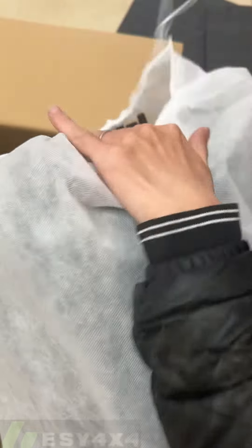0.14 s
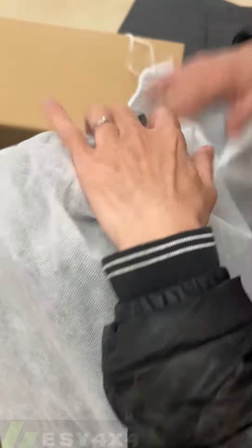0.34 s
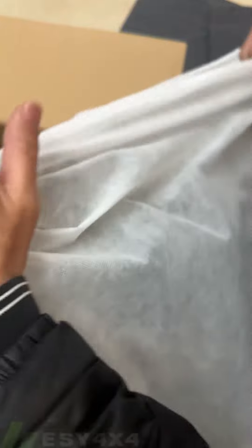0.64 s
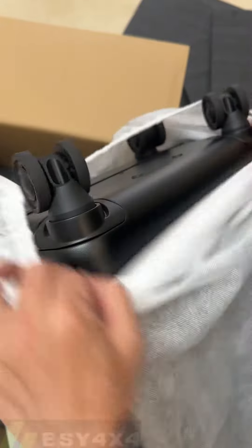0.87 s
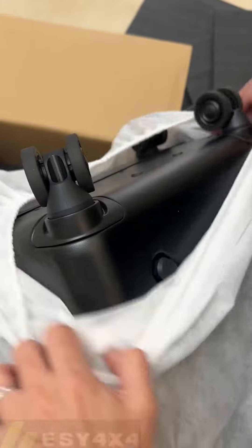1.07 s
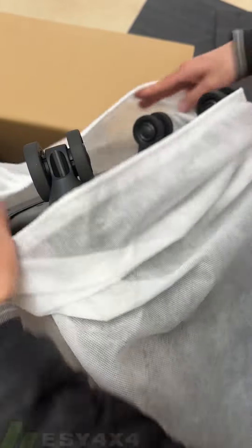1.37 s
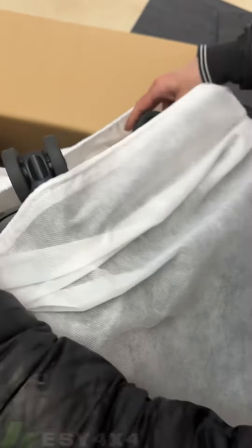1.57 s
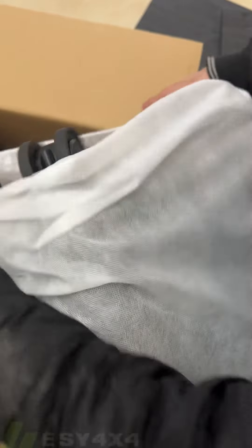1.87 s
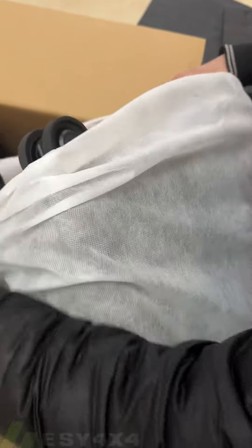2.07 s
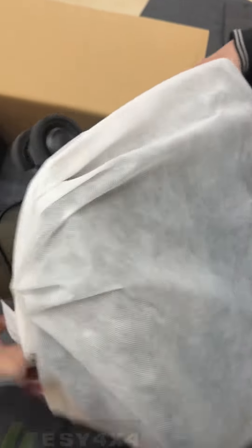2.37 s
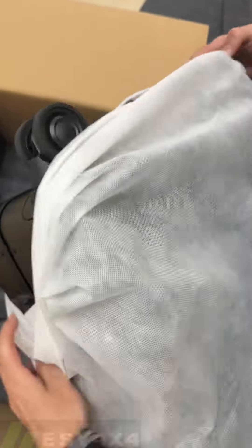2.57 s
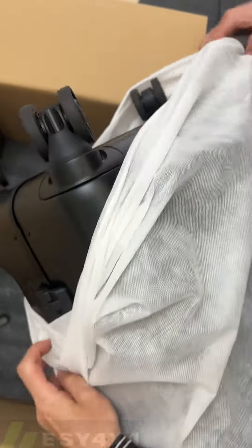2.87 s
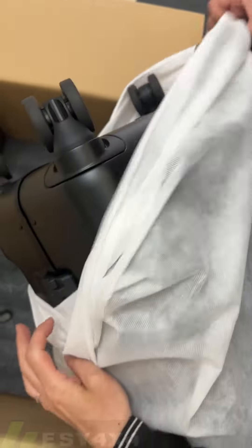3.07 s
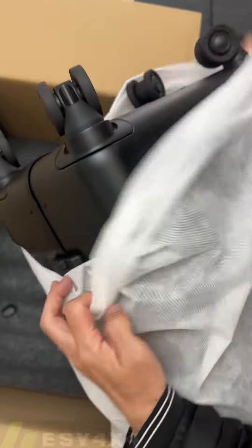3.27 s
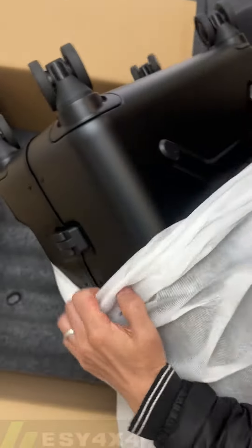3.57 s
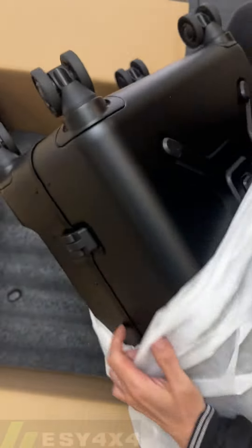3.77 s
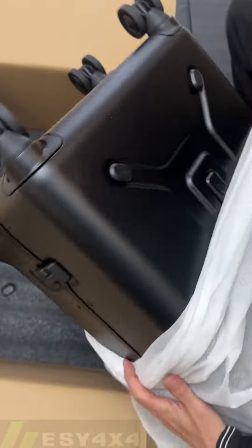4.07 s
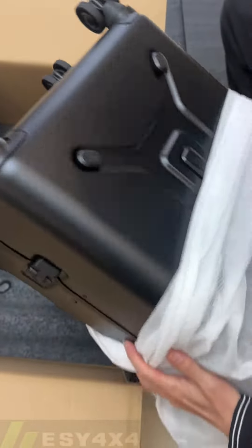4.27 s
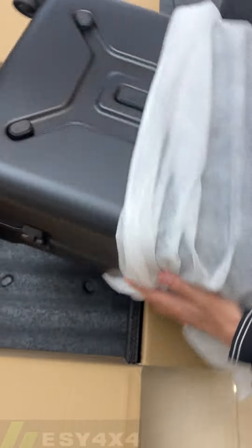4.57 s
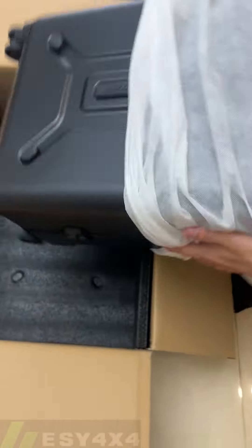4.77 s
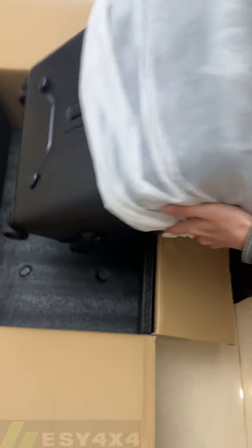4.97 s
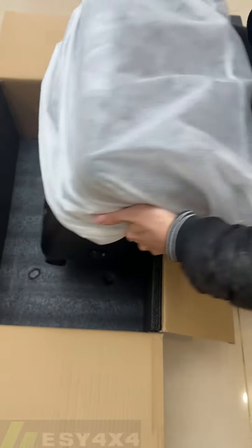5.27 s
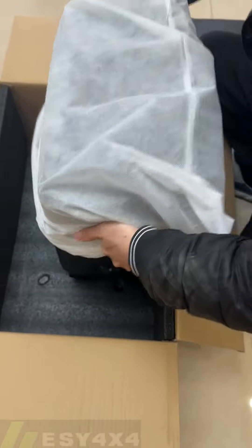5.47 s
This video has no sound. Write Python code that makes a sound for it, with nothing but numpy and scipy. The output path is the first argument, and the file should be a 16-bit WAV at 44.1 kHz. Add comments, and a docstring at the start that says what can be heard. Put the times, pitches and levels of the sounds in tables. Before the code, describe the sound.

Thin fabric bag is dragged off a hollow hard suitcase in a cardboard box, with rustling, scuffing, snaps and dull thumps.

```python
"""In a small room, a soft fabric bag is dragged off a hollow hard suitcase that lies in a cardboard box.
Cloth is shaped noise in swells, snaps are short noise bursts, bumps are rung shell modes with a hard knock.
The sliding shell rumbles as uneven noise; a low hum wavers below, with deep lurches and room tone behind.
A small stereo microphone hears it from close by, as a sum and a difference of two ports."""
import sys
import numpy as np
from scipy import signal
from scipy.fft import rfft, irfft, next_fast_len
from scipy.io import wavfile
from scipy.ndimage import uniform_filter1d, map_coordinates

SR = 44100
rng = np.random.default_rng(int(sys.argv[2]) if len(sys.argv) > 2 else 0)


def materialize(psi):
    """Save the field psi as 16-bit PCM at rate SR to the path in sys.argv[1].

    A 1-D psi becomes a single channel; in a 2-D psi each row is a channel.
    """
    bounded = np.clip(np.atleast_2d(psi).T, -1, 1)
    quanta = np.round(bounded * 32767).astype(np.int16)
    wavfile.write(sys.argv[1], SR, quanta)


N = 248283  # length in samples


def amp(db):
    """dB to gain."""
    return 10 ** (np.asarray(db) / 20)


def unit(x):
    """Each row at rms 1."""
    return x / np.sqrt(np.mean(x ** 2, axis=-1, keepdims=True) + 1e-20)


def along(points, hz):
    """Each column after the frequency, read on a log axis."""
    point_hz, *columns = np.transpose(points)
    log_hz, log_point_hz = np.log(hz + 1), np.log(point_hz + 1)
    return np.squeeze([np.interp(log_hz, log_point_hz, column) for column in columns])


def curves(rows):
    """One value per sample for each column after the time."""
    time_s, *columns = np.transpose(rows)
    return [np.interp(np.arange(N) / SR, time_s, column) for column in columns]


def wobble(knots_per_s):
    """Smooth random curve through normally distributed knots."""
    knots = rng.standard_normal(int(N * knots_per_s / SR) + 4)
    return map_coordinates(knots, [np.arange(N) * knots_per_s / SR])


def filtered(x, response):
    """x times a complex response of frequency."""
    size = next_fast_len(N + SR // 2)
    spectrum = rfft(x, size) * response(np.fft.rfftfreq(size, 1 / SR))
    return irfft(spectrum, size)[..., :N]


def smoothed(x, size, axis=-1):
    """Two passes of a running mean."""
    return uniform_filter1d(uniform_filter1d(x, size, axis), size, axis)


def rush(spectrum, patchy_db, grain_db):
    """Two unrelated noises of rms 1, straight and scattered path, sharing patches and fibre ticks."""
    ticks_db = grain_db * np.repeat(rng.exponential(size=N // 32 + 1), 32)[:N]
    noise = amp(ticks_db) * rng.standard_normal((2, N))
    cells = signal.stft(noise, nperseg=512)[2]
    # patches in time and frequency
    field = rng.standard_normal(cells.shape[1:])
    field = uniform_filter1d(uniform_filter1d(field, 8, 0), 8, 1)
    patches = amp(patchy_db * field / field.std())
    pair = signal.istft(cells * patches, nperseg=512)[1][:, :N]
    return unit(filtered(pair, lambda hz: amp(along(spectrum, hz))))


def swells(peak_s, peak_db, rise_db_per_s, fall_db_per_s):
    """Gain of swells that climb to a rounded peak and sink at a steady dB rate; their powers add."""
    round_s = 0.0061
    peak_s, peak_db, rise, fall = [
        np.reshape(v, (-1, 1)) for v in (peak_s, peak_db, rise_db_per_s, fall_db_per_s)]
    steps = np.arange(0, N + 64, 64)
    t = steps / SR - peak_s
    slope = np.abs(np.where(t < 0, rise, fall))
    gain = amp(peak_db - slope * (np.hypot(t, round_s) - round_s))
    return np.interp(np.arange(N), steps, np.linalg.norm(gain, axis=0))


# pulls on the cloth: (peak time [s], hiss [dB], scuff of the heavier folds [dB], rise [dB/s], fall [dB/s])
CLOTH_PULLS = [(0.25, -57, -80, 800, 290), (0.322, -43.5, -43, 502, 222), (0.499, -50, -51, 73, 125),
               (0.711, -49, -51, 600, 44), (0.826, -50, -42, 502, 400), (0.935, -55.5, -55, 70, 110),
               (1.055, -53.5, -56, 200, 250), (1.15, -51, -51, 220, 31), (1.45, -54, -55, 330, 125),
               (1.485, -55, -55, 200, 600), (1.69, -53.5, -51.5, 90, 29), (1.887, -45, -44.5, 64, 43),
               (2.252, -53, -51, 34, 57), (2.48, -52.5, -50.5, 112, 32), (2.62, -64, -63, 60, 60),
               (2.738, -43, -41.5, 177, 255), (3.025, -52, -53, 300, 92), (3.14, -49.5, -52.5, 220, 53),
               (3.305, -55.5, -51, 76, 15), (3.64, -45.5, -46.5, 24.5, 49), (3.82, -52.5, -49, 200, 45),
               (3.93, -48, -50.5, 35, 116), (4.091, -59, -47.5, 89, 44), (4.43, -40.5, -44.5, 37.5, 87),
               (4.627, -48, -48.5, 68, 75), (4.9, -49, -48, 42, 95), (5.345, -60.5, -50.5, 27, 35),
               (5.469, -48, -48.5, 106, 123), (5.525, -60, -50, 100, 260)]
# fibre hiss spectrum: (frequency [Hz], relative level [dB per Hz])
HISS_SPECTRUM = [(1500, -17), (3500, -7.5), (5500, -3), (8000, -0.5), (11000, -3), (16000, -11)]
# fold scuff spectrum: (frequency [Hz], relative level [dB per Hz])
SCUFF_SPECTRUM = [(200, -62), (600, -2.5), (1200, -2), (2500, -3.5), (4200, -6.5), (6000, -12),
                  (12000, -21)]


def cloth():
    """Fibres hiss over the shell, folds scuff lower down; pulls stutter together over a steady faint rustle."""
    rustle_db, folds_db = -59.5, -60  # steady levels between pulls
    peak_s, hiss_db, scuff_db, rise, fall = np.transpose(CLOTH_PULLS)
    stutter = wobble(45)
    hiss_pulls = swells(peak_s, hiss_db, rise, fall) * amp(0.82 * stutter)
    scuff_pulls = swells(peak_s, scuff_db, rise, fall) * amp(1.4 * stutter)
    hiss = np.hypot(hiss_pulls, amp(rustle_db)) * rush(HISS_SPECTRUM, patchy_db=1.2, grain_db=1.0)
    scuff = np.hypot(scuff_pulls, amp(folds_db)) * rush(SCUFF_SPECTRUM, patchy_db=1.26, grain_db=1.0)
    return hiss + scuff


# snaps of cloth and cord:
# (time [s], peak [dB], centre [Hz], spread each way [pitch ratio, at least 1.1 is used], t60 [s])
CLOTH_SNAPS = [(0.04, -47, 2800, 0.96, 0.034), (0.239, -31.5, 8700, 1.56, 0.038),
               (0.2816, -34, 2400, 1.35, .016), (0.3097, -17, 2500, 2, 0.025),
               (0.3181, -14, 2320, 1.94, 0.021), (0.6276, -43, 6990, 1.6, .015),
               (0.7315, -39, 2970, 0.87, .04), (0.771, -33, 3010, 2.1, .02),
               (0.8173, -30, 3440, 1.9, 0.034), (0.8237, -26, 3480, 1.87, 0.023),
               (0.863, -34, 2860, 1.8, 0.02), (0.9116, -38, 2570, 1.15, .02),
               (2.0309, -33.5, 7080, 1.2, .025), (2.2287, -36, 6960, 1.25, .025),
               (2.7294, -18, 4440, 1.54, 0.014), (2.7392, -28, 4030, 1.3, .028),
               (2.86, -45, 2590, 1.07, .02), (2.9846, -38.5, 2000, 1.5, .016),
               (3.012, -41, 4300, 1.05, 0.036), (3.793, -26, 2370, 1.45, 0.015),
               (4.588, -46, 6500, 1.6, .02), (4.613, -38, 2260, 1.06, .03),
               (4.6201, -23, 10200, 1.28, 0.0093), (5.452, -36, 2670, 0.82, .015),
               (5.474, -30, 2780, 1.05, .014)]


def snaps():
    """A fold or the cord lets go: a burst of noise around its own pitch."""
    out, t = np.zeros(N + SR), np.arange(SR // 8) / SR
    rise = 1 - np.exp(-t / .0005)
    for time_s, peak_db, centre_hz, spread, t60_s in CLOTH_SNAPS:
        ratio = max(spread, 1.1)
        band_hz = [centre_hz / ratio, min(centre_hz * ratio, 19000)]
        bandpass = signal.butter(2, band_hz, "bandpass", fs=SR, output="sos")
        noise = signal.sosfilt(bandpass, rng.standard_normal(len(t)))
        burst = amp(-60 * t / t60_s) * rise * noise
        out[round(time_s * SR):][:len(t)] += amp(peak_db) * burst / np.abs(burst).max()
    return out[:N]


# bumps on the shell: (time [s], ring peak [dB], pitch that the spot favours [Hz],
# hard edge before a common lift [dB re ring peak], ring time [share of free ring], softness [cycles of swell])
SHELL_BUMPS = [(0.282, -34, 560, 0, .92, 0.61), (0.31, 0, 253.5, -14.5, .8, 0.82),
               (0.911, -28.5, 360, -4.5, 0.56, 1.7), (0.934, -30, 207, -19, 0.55, 0.4),
               (1.051, -34.5, 144, -18, 0.52, 1.9), (1.385, -29, 186, -47, 1.16, 1.3),
               (1.875, -32, 710, -4, 0.23, 0.75), (1.884, -27, 236, -16, 0.8, 0.41),
               (2.248, -28.5, 197, -21, 1.1, 1.8), (2.415, -37, 570, -6, 0.68, 1.2),
               (2.485, -26, 197, -32, 0.87, 1.7), (2.746, -36.5, 218, -24, 0.9, 0.86),
               (2.859, -28.5, 326, -8.5, 0.47, 3.3), (3.011, -33.5, 360, -7, 0.45, 3.6),
               (3.021, -23.5, 133, -17, 0.6, 1.1), (3.118, -33, 148, -6, 1.5, 1.4),
               (3.177, -24, 148, -40, 0.26, 1.8), (3.301, -26.5, 260, -38, 0.27, 5.7),
               (3.547, -34, 486, -28, 0.81, 1.04), (3.797, -24.5, 146, -11, .44, 1),
               (3.875, -26, 236, -24, 0.5, 0.76), (3.915, -39, 135, -5, 1.3, 1.4),
               (3.946, -33.5, 132, -10, 0.28, 0.69), (4.02, -40, 210, -15, 1, 2.6),
               (4.049, -28, 416, -38, 0.68, 1.2), (4.084, -24, 204, -45, 0.57, 0.36),
               (4.462, -26, 570, -31, 0.76, 0.55), (4.879, -33, 436, -24, 1.5, .75),
               (4.894, -33, 181, -21, 0.79, 0.92), (5.053, -42, 132, -11, 1.1, 1.1),
               (5.242, -36.5, 132, -12, 1.1, 0.92), (5.451, -19, 290, -11.5, 1, 0.93),
               (5.47, -19.5, 350, -22, 1.66, 1), (5.485, -17, 132, -22, .74, 0.31),
               (5.512, -19, 153, -18, 0.5, 0.79), (5.519, -16.5, 141, -19, 0.82, .91)]
# modes of the free shell: (frequency [Hz], relative level, halved in use [dB], base t60 [s])
SHELL_MODES = [(48, -7, 0.47), (101.8, -21, 0.26), (142.9, -3.5, 0.52), (157.5, 13.5, 0.17),
               (214.8, -12.5, 0.31), (225.2, 5.5, 0.25), (309, -3.5, 0.15), (337.4, -5.5, 0.16),
               (409, -8, 0.14), (455.3, -12.5, 0.15), (500.3, -14, 0.11), (596.7, -24, 0.27),
               (652.6, -16.5, .14), (728, -10, 0.084), (836, -8, 0.038), (935, -42, 0.3),
               (1050, -23, 0.028), (1204, -23, 0.07)]


def bumps():
    """Each bump rings the shell modes near its spot's pitch; high modes speak at once, low ones swell."""
    out, t = np.zeros(N + SR), np.arange(SR // 2) / SR
    hz, mode_db, t60_s = np.transpose(SHELL_MODES)[:, :, None]
    for time_s, peak_db, spot_hz, edge_db, share, soft_cycles in SHELL_BUMPS:
        level_draw, pitch_draw = rng.standard_normal((2, len(hz), 1))
        octaves = np.log2(hz / spot_hz)
        tilt_db = -7 * np.maximum(octaves, 0) + 27 * np.minimum(octaves, 0)
        favour_db = .5 * mode_db + tilt_db + 2.8 * level_draw
        swell = (1 - np.exp(-t * hz / soft_cycles)) ** 2
        # the panels lose most of the blow quickly, the enclosed air rings on
        life_s = t60_s * share
        panels = amp(-60 * t / (life_s * 0.6))
        enclosed_air = amp(-4 - 60 * t / (life_s * 1.08))
        fade = amp(favour_db) * (panels + enclosed_air)
        tones = np.sin(2 * np.pi * hz * (1 + 0.0079 * pitch_draw) * t)
        ring = (fade * swell * tones).sum(axis=0)
        edge = amp(edge_db) * hard_edge(t, pitch_draw[0])
        out[round(time_s * SR):][:len(t)] += amp(peak_db) * (ring / np.abs(ring).max() + edge)
    return out[:N]


def hard_edge(t, pitch_draw):
    """Short rough knock whose pitch sinks as the touching area spreads."""
    scale_hz = 1120 * (1 + 0.0786 * pitch_draw)
    cycles = scale_hz * (0.3897 * t + 0.742 * 0.00691 * (1 - np.exp(-t / 0.0065)))
    rough = 1 + 0.93 * unit(smoothed(rng.standard_normal(len(t)), 24))
    rise = 1 - np.exp(-t / .0005)
    return amp(2.5 - 60 * t / 0.1) * rise * rough * np.sin(2 * np.pi * cycles)


# rumble spectrum: (frequency [Hz], relative level [dB per Hz])
RUMBLE_SPECTRUM = [(65, -22), (110, 2.5), (161, 1), (201, 1.5), (285, -3.5), (441, -4.5), (481, -8.5),
                   (668, -13), (1140, -18.5), (1500, -19), (1950, -47), (3300, -120)]
# shell sliding on cardboard and foam, with the hum: (time [s], rumble [dB], hum [dB]); both waver around these
SLIDE_LEVELS = [(0.0, -54.5, -61), (0.22, -56.5, -53), (0.42, -44, -47), (0.62, -55.5, -57),
                (0.8, -46.5, -56), (0.93, -42.5, -62), (1.0, -47.5, -58), (1.32, -55.5, -57),
                (1.42, -47, -47), (1.6, -52, -59), (1.85, -46.5, -52), (2.3, -48.5, -54),
                (2.66, -51.5, -57.5), (3.1, -44.5, -57), (3.68, -49.5, -62), (3.85, -36.5, -55),
                (4.04, -38, -50), (4.2, -49, -56), (4.36, -42, -45.5), (4.6, -47, -58), (5.0, -47, -51),
                (5.42, -51, -59), (5.49, -30, -27.5), (5.63, -50.5, -53)]


def slide_rumble():
    """Stick and slip shakes the shell in lumps: noise under two random level curves."""
    rumble_db = curves(SLIDE_LEVELS)[0] + 1.3 * wobble(30) + 1.5 * wobble(10)
    return amp(rumble_db) * rush(RUMBLE_SPECTRUM, patchy_db=2.0, grain_db=-0.5)


def low_hum():
    """Noise in a narrow resonance, its level wavering by chance."""
    centre_hz, half_width_hz, waver_db = 99, 9, 2
    hum_db = curves(SLIDE_LEVELS)[1] + waver_db * wobble(15)
    narrow = lambda hz: 1 / (1 + ((hz - centre_hz) / half_width_hz) ** 2)
    return amp(hum_db) * unit(filtered(rng.standard_normal((2, N)), narrow))


# weight lurching on the box and floor: (peak time [s], level [dB])
WEIGHT_LURCHES = [(0.37, -39), (0.53, -45), (1.22, -54), (1.43, -54), (1.85, -52.5), (2.29, -49),
                  (2.46, -46), (3.06, -58), (3.42, -45.5), (3.9, -47), (4.0, -47.5), (4.14, -47),
                  (5.13, -61), (5.54, -39)]
# deep rumble spectrum: (frequency [Hz], relative level [dB per Hz])
GROUND_SPECTRUM = [(12, -44), (20, -21), (75, 16), (98, -36), (160, -120)]


def lurches():
    """Shifting weight swells a deep noise over its steady level."""
    rise_db_per_s, fall_db_per_s, steady_db = 200, 140, -65
    peak_s, peak_db = np.transpose(WEIGHT_LURCHES)
    weight = np.hypot(swells(peak_s, peak_db, rise_db_per_s, fall_db_per_s), amp(steady_db))
    return weight * rush(GROUND_SPECTRUM, patchy_db=-3, grain_db=3)


# room tone spectrum: (frequency [Hz], relative level [dB per Hz])
AIR_SPECTRUM = [(35, -33), (60, -3), (85, -8), (109, 9), (156, -12.5), (219, -3.5), (642, -25),
                (1500, -34.5), (1950, -39), (3300, -120)]


def room_tone():
    """Steady shaped noise."""
    return amp(-57.0) * rush(AIR_SPECTRUM, patchy_db=-1, grain_db=-1.0)


# room decay: (frequency [Hz], t60 [s])
ROOM_DECAY = [(100, 0.3), (500, 0.32), (2000, 0.25), (10000, 0.077)]


def room(x):
    """Each frequency of the room's answer dies at its own speed; one answer for each path."""
    delay_samples = 200
    noise = rng.standard_normal((2, SR // 2))
    hz, t, cells = signal.stft(noise, SR, nperseg=256)
    decay = amp(-60 * t / along(ROOM_DECAY, hz)[:, None])
    tail = signal.istft(cells * decay, SR, nperseg=256)[1]
    tail = tail / np.linalg.norm(tail[0])
    delayed = np.pad(x, (delay_samples, 0))[None]
    return signal.fftconvolve(delayed, tail, axes=1)[:, :N]


# the two ports: (frequency [Hz], sum [dB], difference [dB],
# share of the difference tied to the sum [0..1], its lead [rad])
MIC_PORTS = [(61.4, 2, -28, 0.53, .7), (193, -2, -24.5, 0.86, 0.97), (496, -2, -10.5, 0.93, 1.24),
             (833, -2.5, -8.5, 0.45, .4), (1320, -4, -12, 0.32, -0.33), (1480, -4, -26.5, .1, 0),
             (2320, -3.5, -29, .1, 0), (2660, -3, -10, .2, .5), (4370, -6.5, -10, 0.13, -0.96),
             (5170, -9.5, -5, .4, -1.3), (5040, -5.5, -4, 0.22, -1), (5760, -2.5, -25, .1, -1.5),
             (7000, -2.5, -11, .2, -1.6), (6600, -2, -11.5, .7, -1.6), (9400, -4, -4, .9, -1.56),
             (9830, -5, 0, 1, -1.6), (10870, -10.5, -11, 0.45, -1.5), (11530, -32, -6.5, .1, -1.5),
             (13800, -53, -4.5, .1, 1.6), (14240, -10, -11, .5, 1.6), (15800, -3.5, 8, .6, 1.5)]


def microphone(paths):
    """Port sum from the straight path; difference from that path, phase-shifted, and the scattered one."""
    def response(hz):
        sum_db, difference_db, tied, lead_rad = along(MIC_PORTS, hz)
        tied = np.clip(tied, 0, 1)
        mid = amp(sum_db) + 0j
        shifted = amp(difference_db) * tied * np.exp(1j * lead_rad)
        loose = amp(difference_db) * np.sqrt(1 - tied ** 2)
        return np.array([mid, shifted, loose])
    straight, scattered = 0, 1
    mid, shifted, loose = filtered(paths[[straight, straight, scattered]], response)
    side = shifted + loose
    return np.array([mid + side, mid - side])


def scene():
    """Hits with their room, the rubbing and the background, at the microphone."""
    hits = snaps() + bumps()
    wet = room(hits)
    hit_paths = np.array([hits + amp(-15.0) * wet[0], amp(-7.5) * wet[1]])
    rubbing = cloth() + slide_rumble()
    background = low_hum() + lurches() + room_tone()
    return microphone(hit_paths + rubbing + background)


def record(dry):
    """Peaks are rounded off towards a ceiling; nothing is kept above the band limit."""
    ceiling, top_hz = .95, 15850
    rounded = dry / (1 + np.abs(dry / ceiling) ** 6) ** (1 / 6)
    return filtered(rounded, lambda hz: hz < top_hz)


dry = scene()
out = record(dry)
materialize(out)
```